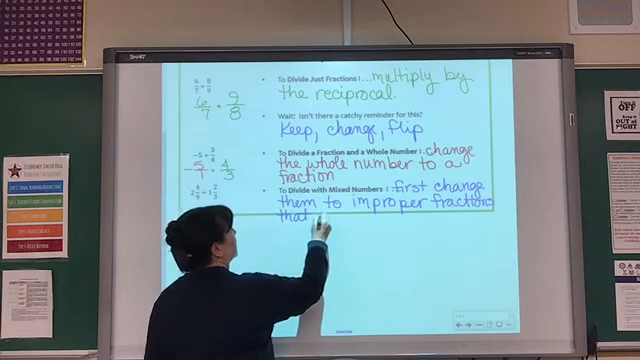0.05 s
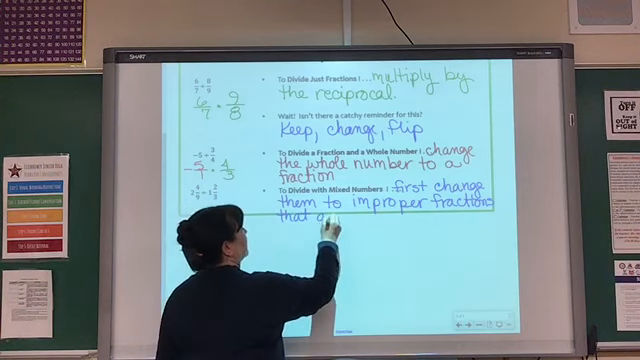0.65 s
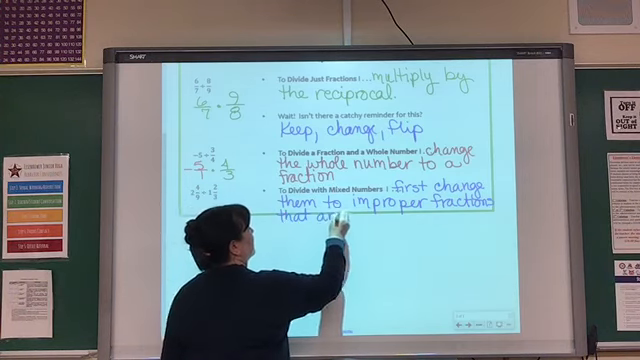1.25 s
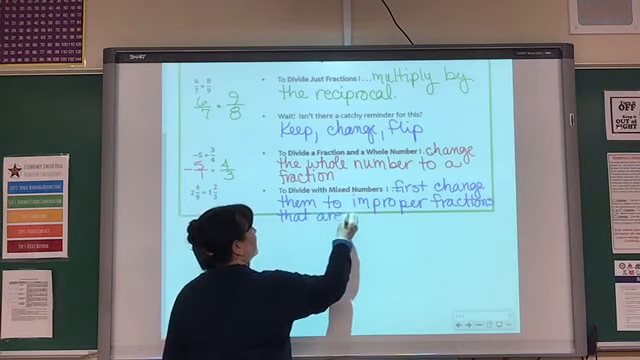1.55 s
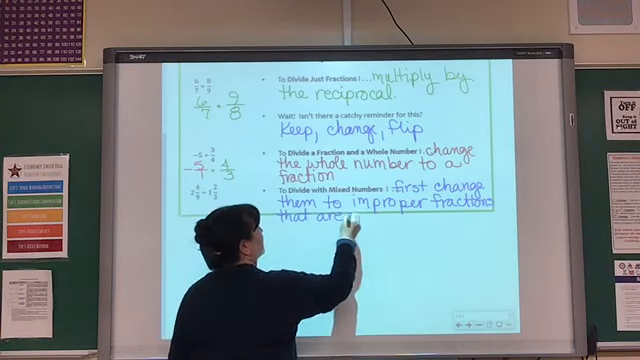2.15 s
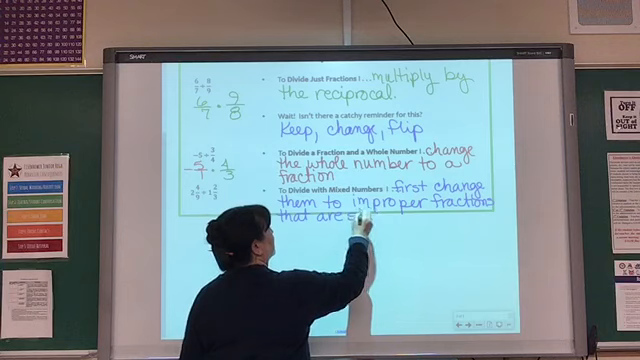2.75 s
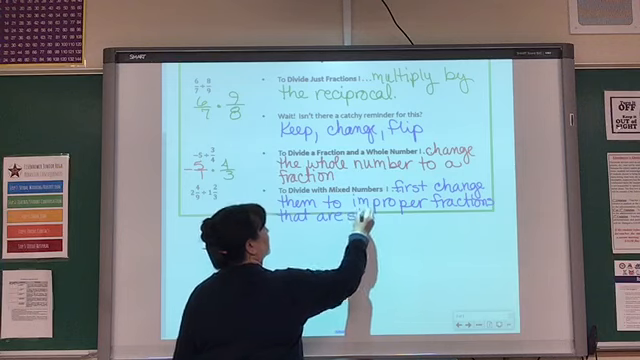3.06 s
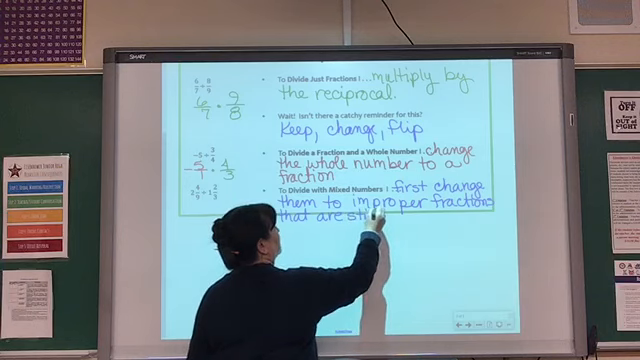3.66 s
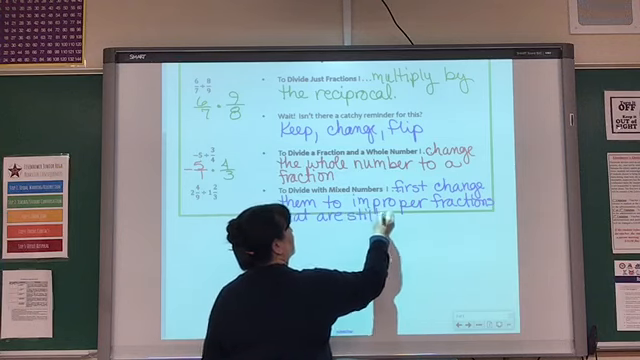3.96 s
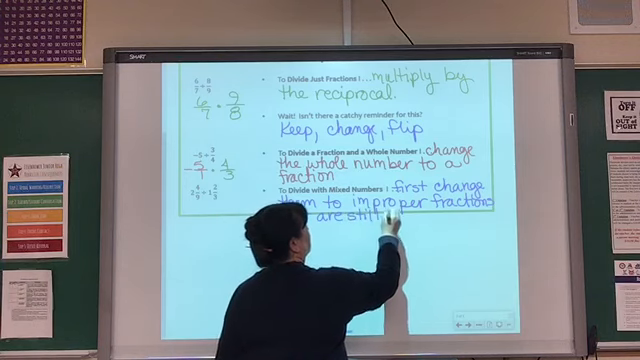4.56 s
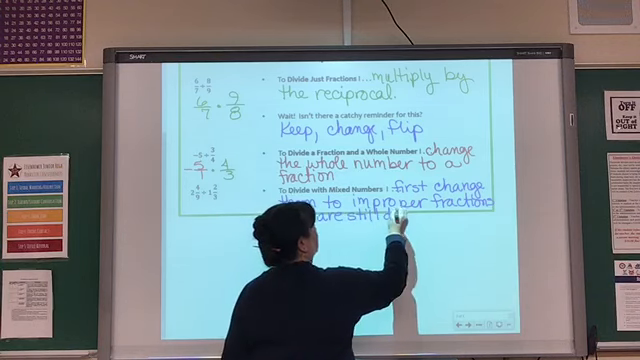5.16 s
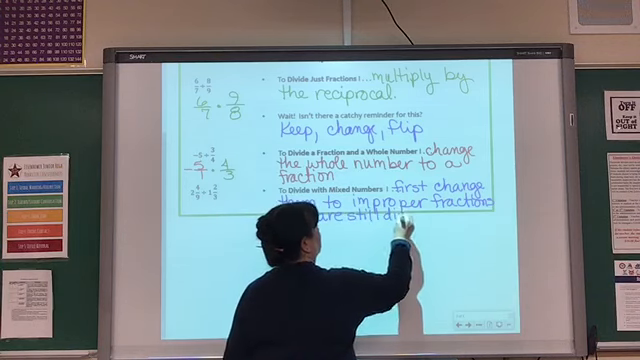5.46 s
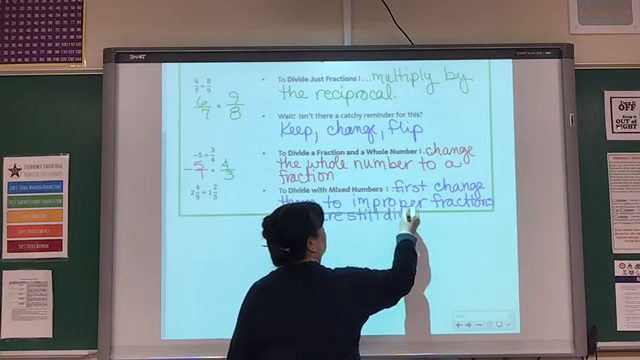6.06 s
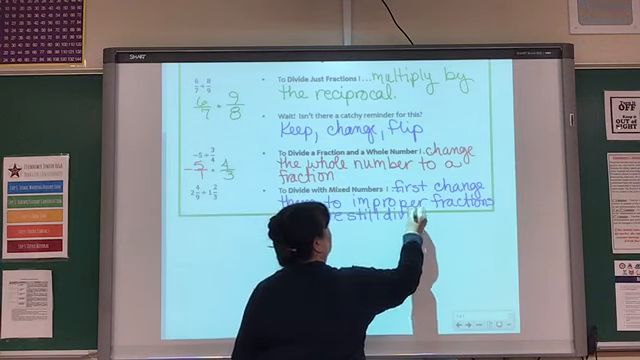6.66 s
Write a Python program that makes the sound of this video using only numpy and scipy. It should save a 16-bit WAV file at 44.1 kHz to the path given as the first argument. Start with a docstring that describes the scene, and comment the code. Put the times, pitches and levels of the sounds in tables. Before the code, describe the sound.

A pen writes on an electronic whiteboard in a classroom, heard from a few metres away with a short room echo. About fifteen unevenly spaced taps each give a hollow thud, duller at first and harder later on. Faint rubbing and two tiny scrapes come between them, and a loose frame part buzzes lightly near the end. Ventilation rumble and soft hiss run underneath, easing slightly before halfway.

```python
"""Ventilation rumble and microphone hiss swell up in a classroom and ease a little near 2.8 s.
From 0.6 s a hard pen writes, left to right, on a wall-mounted electronic whiteboard.
At each landing the tip ticks and knocks, the hollow board booms, its surface sheet rattles
and, late in the line, a loose frame part buzzes. Between landings the tip slides and squeaks
faintly; twice, past the middle, it sticks and slips in a short scrape."""
import sys
import numpy as np
from scipy import signal
from scipy.fft import rfft, irfft
from scipy.io import wavfile

SR = 44100
rng = np.random.default_rng(int(sys.argv[2]) if len(sys.argv) > 2 else 0)


def output_pcm(signal):
    """Save a mono or channel-first signal as 16-bit PCM at the path in sys.argv[1].

    Samples are clipped to [-1, 1] before scaling.
    """
    pcm = np.clip(np.atleast_2d(signal).T, -1, 1) * 32767
    wavfile.write(sys.argv[1], SR, np.round(pcm).astype(np.int16))


N = 305172
TIME = np.arange(N) / SR


def amp(db):
    """dB to gain."""
    return 10 ** (np.asarray(db) / 20)


def unit(x):
    """Scale to rms 1."""
    return x / np.sqrt(np.mean(x ** 2) + 1e-20)


def unit_hit(x):
    """Scale to rms 1 over the first 45 ms."""
    return x / np.sqrt(np.mean(x[:2000] ** 2) + 1e-20)


def read(points, hz):
    """Interpolate (f, value) rows over log frequency."""
    f, value = np.transpose(points)
    return np.interp(np.log(hz + 1), np.log(f), value)


def add(mix, start_s, sound):
    """Mix a sound in at start_s."""
    part = mix[max(round(start_s * SR), 0):][:len(sound)]
    part += sound[:len(part)]


def coloured(x, spectrum, size=4096):
    """Minimum-phase filter; attacks stay sharp."""
    log_gain = np.log(amp(read(spectrum, abs(np.fft.fftfreq(size, 1 / SR)))))
    impulse = np.fft.ifft(np.exp(np.conj(signal.hilbert(log_gain)))).real
    return signal.oaconvolve(x, impulse)[:len(x)]


def pen_landings(knock_db=-3, tick_db=-42, buzz_db=-1, buzz_fall_db=24, loose_place=0.76):
    """The pen strikes the board along the line; place runs from 0 (left) to 1 (right)."""
    # landings: t/s, weight/dB, hardness/dB
    landings = [(0.6369, -15.5, -29.5), (1.1077, -16.5, -38.5), (1.7058, -17.5, -37.5),
                (2.3801, -15.5, -28), (2.6721, -17, -33), (3.139, -17, -27), (3.364, -15, -24.5),
                (3.7334, -16, -23.5), (4.1194, -22, -37.5), (4.84, -15, -25), (5.1328, -15, -25.5),
                (5.3267, -14, -23), (5.835, -15.5, -28), (6.1241, -16.5, -28), (6.3568, -15, -28)]
    out, t = np.zeros(N), np.arange(SR * 3 // 4) / SR
    left, right = rng.standard_normal((2, len(t)))
    for start_s, weight_db, hardness_db in landings:
        place = start_s / TIME[-1]
        # more rattle when heavier, harder or further right
        rattle_db = -48.5 + 0.55 * (weight_db + 17) + 0.43 * (hardness_db + 30) + 4.5 * (place - 0.5)
        distance_db = -buzz_fall_db * abs(place - loose_place)
        swing = unit_hit(early_returns(boom(t, place, hardness_db)))
        # nearby landings share part of their waveform
        waves = np.cos(np.pi * place) * left + np.sin(np.pi * place) * right
        waves += rng.standard_normal(len(t))
        add(out, start_s, amp(weight_db) * swing)
        add(out, start_s, amp(weight_db + tick_db) * tick(t))
        add(out, start_s, amp(hardness_db + knock_db) * knock(t, waves, place, hardness_db))
        add(out, start_s, amp(rattle_db) * rattle(t, swing))
        add(out, start_s, amp(rattle_db + buzz_db + distance_db) * buzz(t))
    return out


def boom(t, place, hardness_db, rise_s=0.00076):
    """Hollow board rings; place sets the mode mix, a softer landing pushes longer."""
    # board modes: f/Hz, t60/s, level at line start/dB, level at line end/dB
    modes = [(101.8, 0.27, -28, -25), (111.4, 0.31, -9.5, -16), (143.9, 0.69, -30.5, -24.5),
             (158.3, 0.26, -25, -26.5), (182, 0.33, -24.5, -12), (195.2, 0.15, -6.5, -13),
             (226.6, 0.36, -21.5, -28), (252.7, 0.39, -23.5, -15.5), (276.2, 0.31, -3, -36.5),
             (288.6, 0.21, -18, -2), (300, 0.62, -4.5, -9), (319.6, 0.37, -2, -10.5),
             (338.5, 0.26, -22, -14), (360.4, 0.23, -14, -15), (380.5, 0.11, -12.5, -4),
             (410.6, 0.3, -20, -18.5), (420.1, 0.3, -12.5, -5.5), (437, 0.18, -31.5, -35),
             (471.6, 0.4, -9.5, -32.5), (490.5, 0.42, -31.5, -25), (560.2, 0.48, -34.5, -22.5),
             (653, 0.17, -17, -11), (758, 0.4, -36, -37.5)]
    hz, t60_s, start_db, end_db = np.transpose(modes)[:, :, None]
    level_db = start_db + place * (end_db - start_db) - 60 * t / t60_s
    ring = -(amp(level_db) * np.sin(2 * np.pi * hz * t)).sum(0) * (1 - np.exp(-t / rise_s))
    contact_s = 0.00032 * amp(-0.6 * (hardness_db + 28.5))
    push = np.exp(-t / contact_s)
    return unit_hit(signal.fftconvolve(ring, push)[:len(t)])


def knock(t, waves, place, hardness_db, t60_s=0.17, rise_s=0.0032):
    """Tip impulse, then a build-up of dense, short-lived panel modes; harder is brighter."""
    # knock spectra, mid-board and near the frame: f/Hz, level/dB
    mid_spectrum = [(40, -25), (80, -7.5), (150, -10), (300, -14.5), (430, 5), (540, -1.5), (680, 3.5),
                    (920, -4), (1150, -6), (1450, -12.5), (2000, -27.5), (3000, -55.5)]
    edge_spectrum = [(40, -21), (80, -4), (150, -14), (300, -9), (420, 7), (505, -5), (730, 2.5), (830, -3),
                     (950, -5.5), (1080, -11.5), (1400, -11), (2000, -32.5), (3000, -60.5)]
    drive = waves * amp(-60 * t / t60_s) * (1 - np.exp(-t / rise_s))
    drive[0] -= 17  # tip impulse
    edge = np.clip((place - 0.56) / 0.11, 0, 1)
    hz = np.geomspace(40, 3000, 80)
    tilt_db = 0.14 * (hardness_db + 27) * np.log2(np.maximum(hz / 600, 1))
    colour_db = (1 - edge) * read(mid_spectrum, hz) + edge * read(edge_spectrum, hz) + tilt_db
    return unit_hit(coloured(drive, np.c_[hz, colour_db]))


def rattle(t, swing, decay_s=0.046, rise_s=0.0013, grain=0.65):
    """Surface sheet chatters against its backing while the panel swings hard."""
    # chatter spectrum: f/Hz, level/dB
    spectrum = [(900, -6.5), (1450, 4.5), (1850, 1), (2200, -4.5), (2700, -4), (3700, -9), (4300, -10),
                (5200, -13), (7000, -18.5), (9000, -26), (11300, -34.5), (12500, -63.5)]
    contact = 1 + np.maximum(unit_hit(swing), 0)
    clicks = rng.standard_normal(len(t)) * np.exp(grain * rng.standard_normal(len(t)))
    envelope = np.exp(-(t / decay_s) ** 2) * (1 - np.exp(-t / rise_s))
    return unit_hit(coloured(clicks * contact * envelope, spectrum))


def buzz(t, band_hz=(1775, 1965), crest_s=0.019, spread_s=0.02):
    """Loose plastic frame part, shaken just after the blow."""
    shake = rng.standard_normal(len(t)) * np.exp(-((t - crest_s) / spread_s) ** 2)
    resonance = signal.butter(2, band_hz, "band", fs=SR)
    return unit_hit(signal.lfilter(*resonance, shake))


def tick(t, decay_s=0.0038):
    """Hard tip clicks on contact."""
    # tip spectrum: f/Hz, level/dB
    spectrum = [(1000, -22.5), (2000, -2.5), (3850, -18.5), (4250, 4.5), (4700, -14.5), (7000, -14),
                (10000, -26.5), (12500, -51)]
    burst = rng.standard_normal(len(t)) * np.exp(-t / decay_s)
    return unit_hit(coloured(burst, spectrum))


def sliding(grain=0.31, squeak_hz=4300, squeak_width_hz=250):
    """Friction hisses and rings the tip; firm, long strokes squeak more."""
    # strokes: t/s, length/s, level/dB
    strokes = [(0.832, .1, -61.5), (1.144, .38, -65.5), (1.736, 0.46, -74), (2.63, 0.035, -64),
               (2.692, 0.25, -52.5), (3.45, .08, -62.5), (3.862, 0.082, -56), (4.072, 0.03, -63),
               (4.272, .081, -65), (6.627, 0.16, -62.5)]
    # friction spectrum: f/Hz, level/dB
    spectrum = [(900, 1.5), (1700, -5.5), (3000, 3), (5000, -6), (7000, -8), (9500, -17.5), (11500, -24),
                (13000, -44)]
    out = np.zeros(N)
    tip = signal.iirpeak(squeak_hz, squeak_hz / squeak_width_hz, SR)
    for start_s, length_s, level_db in strokes:
        noise, roughness = rng.standard_normal((2, SR))[:, :int(length_s * SR)]
        friction = noise * np.exp(grain * roughness)
        rub = amp(level_db) * unit(coloured(friction, spectrum))
        squeak_db = -71 + 0.3 * (level_db + 59.5) + 4.5 * np.log2(length_s / 0.22)
        squeak = amp(squeak_db) * unit(signal.lfilter(*tip, friction))
        add(out, start_s, (rub + squeak) * signal.windows.tukey(len(rub), 0.4))
    return out


def scraping(band_hz=(1265, 1815), gap_s=0.018, jitter_s=0.0016, t60_s=0.089, fall_db_per_s=97):
    """Stick-slip: a dying run of tip catches rings the pen barrel."""
    # scrapes: t/s, length/s, relative level/dB
    scrapes = [(3.484, .035, -51), (3.852, .08, -40.5)]
    out, t = np.zeros(N), np.arange(SR // 10) / SR
    barrel = signal.butter(2, band_hz, "band", fs=SR)
    for start_s, length_s, level_db in scrapes:
        for delay_s in np.arange(0, length_s, gap_s):
            slip = rng.standard_normal(len(t)) * amp(-60 * t / t60_s)
            catch_db = level_db - 7 - fall_db_per_s * delay_s
            catch = amp(catch_db) * unit_hit(signal.lfilter(*barrel, slip))
            add(out, start_s + delay_s + jitter_s * rng.standard_normal(), catch)
    return out


def early_returns(x):
    """A blow plus its reflections from frame, floor and wall."""
    # reflections: delay/s, level/dB
    reflections = [(0.0052, 3.5), (0.0132, -2.5), (0.0205, -19.5), (0.0274, -9.5), (0.0443, -12)]
    out = x.copy()
    for delay_s, level_db in reflections:
        add(out, delay_s, amp(level_db) * x)
    return out


def room(x, gap_s=0.029, rise_s=0.017):
    """Diffuse classroom tail, top treble dying first; unit gain over 100-1000 Hz."""
    # reverberation time: f/Hz, t60/s
    decay = [(100, 0.59), (400, 0.61), (1000, 0.43), (3000, 0.57), (9000, .2)]
    hz, t, bins = signal.stft(rng.standard_normal(SR), SR, nperseg=256)
    tail = signal.istft(bins * amp(-60 * t / read(decay, hz)[:, None]), SR, nperseg=256)[1]
    tail *= np.clip((np.arange(len(tail)) / SR - gap_s) / rise_s, 0, 1)
    low_band = abs(rfft(tail, SR))[100:1000]
    return signal.fftconvolve(x, tail)[:N] / np.sqrt(np.mean(low_band ** 2))


def background(vent_db=-36.5, hiss_db=-59, whine_db=-82.5, whine_hz=8000, swell_s=0.36):
    """Ventilation rumble, microphone hiss and thin electronic whine; all swell in, then ease."""
    # ventilation and hiss spectra: f/Hz, level/dB
    vent_spectrum = [(12, -59), (20, -36.5), (48, -6.5), (117, 0.5), (164, -7), (200, -0.5), (238, -10),
                     (302, -8.5), (390, -13.5), (430, -12.5), (544, -21), (1000, -21.5), (1060, -27.5),
                     (1290, -26), (2200, -40), (2860, -50.5), (4840, -120)]
    hiss_spectrum = [(1200, -3.5), (2200, 0.5), (3600, -2), (4300, -1.5), (5200, -2.5), (7000, -4.5),
                     (8000, -13), (9000, -10.5), (10500, -19), (12000, -27.5), (13000, -56)]
    hz = np.fft.rfftfreq(N, 1 / SR)
    vent = shaped_noise(amp(read(vent_spectrum, hz)))
    hiss = shaped_noise(amp(read(hiss_spectrum, hz)))
    waver_db = shaped_noise(hz < 8)
    whine = np.sqrt(2) * np.sin(2 * np.pi * whine_hz * TIME)
    hush = np.exp(-TIME / swell_s)
    rumble = amp(vent_db + waver_db - 12.5 * hush) * vent
    electronics = (amp(hiss_db) * hiss + amp(whine_db) * whine) * amp(-13.5 * hush)
    ease_db = -2.5 * (1 + np.tanh((TIME - 2.82) / 0.3)) / 2
    return (rumble + electronics) * amp(ease_db)


def shaped_noise(gain):
    """Noise of rms 1, weighted per frequency bin."""
    return unit(irfft(rfft(rng.standard_normal(N)) * gain, N))


def scene(room_db=-16, low_cut_hz=85):
    """Pen and board from a few metres back, their deep bass trimmed by a low-cut filter."""
    low_cut = signal.butter(2, low_cut_hz, "high", fs=SR)
    pen = signal.lfilter(*low_cut, pen_landings() + sliding() + scraping())
    return (pen + amp(room_db) * room(pen) + background())[None]


def record(dry):
    """Band limit at 12.6 kHz."""
    low_pass = signal.firwin(511, 12600, window=("kaiser", 9), fs=SR)
    return signal.oaconvolve(dry, low_pass[None], "same")


dry = scene()
out = record(dry)
output_pcm(out)
```